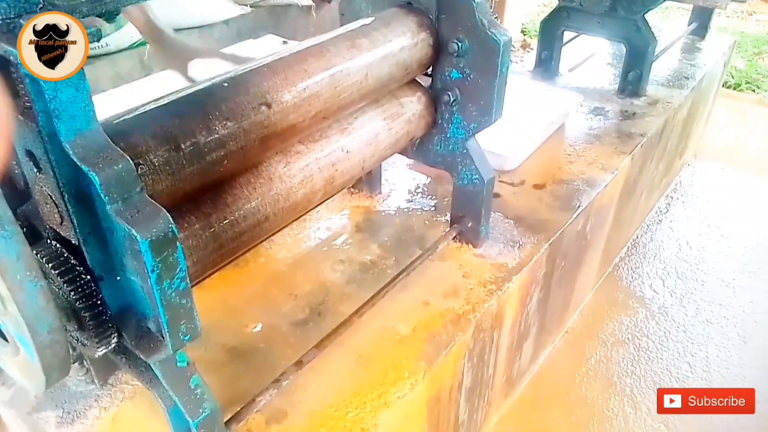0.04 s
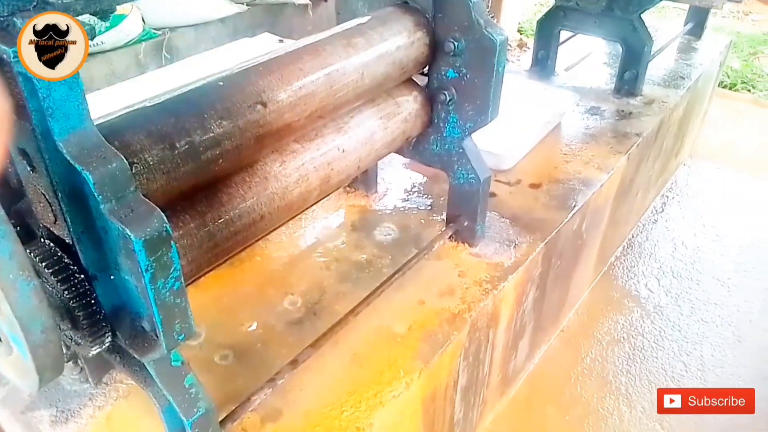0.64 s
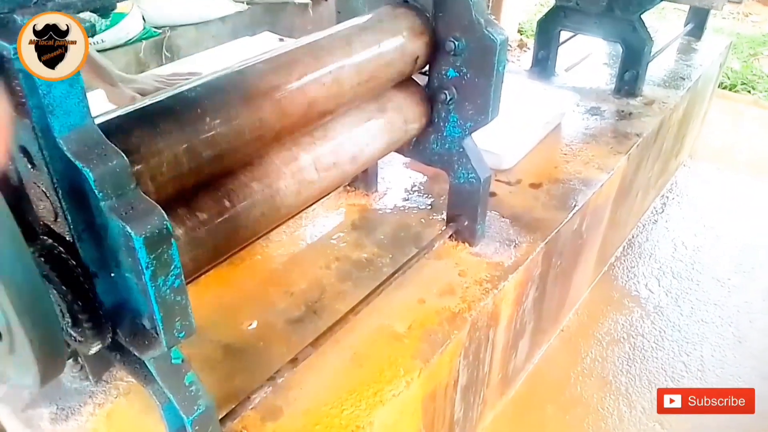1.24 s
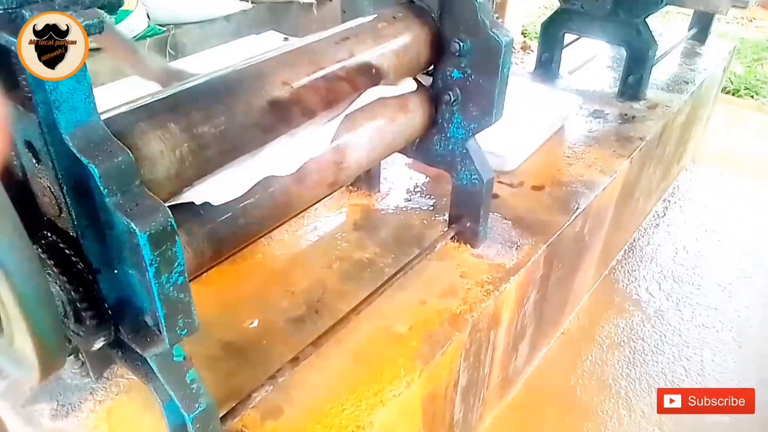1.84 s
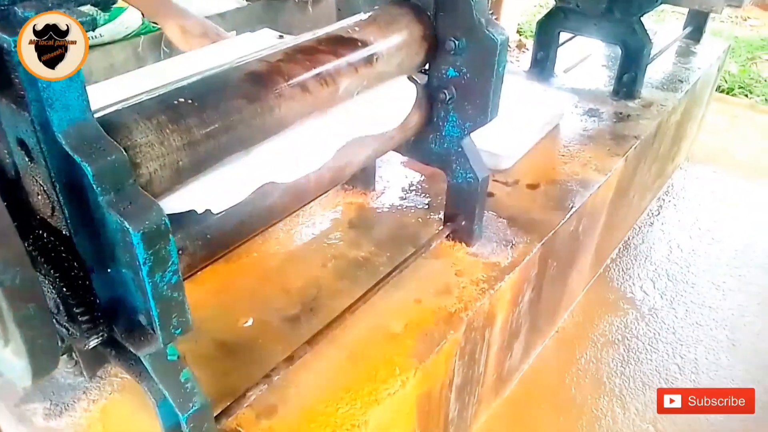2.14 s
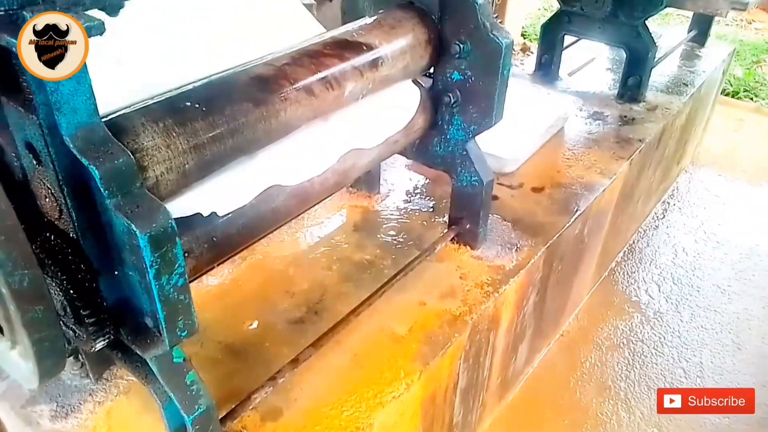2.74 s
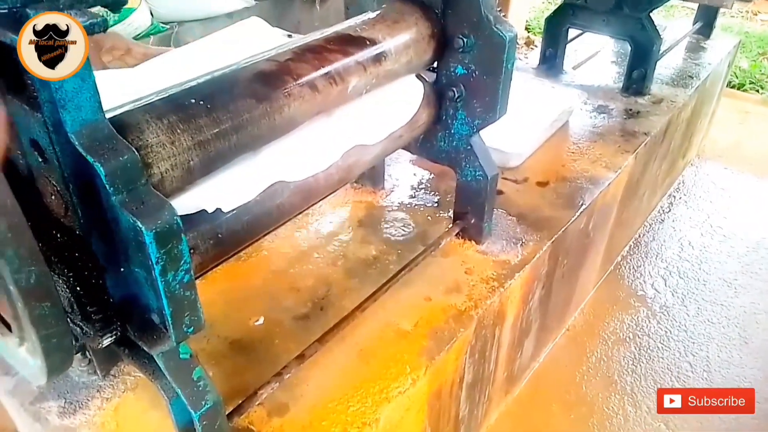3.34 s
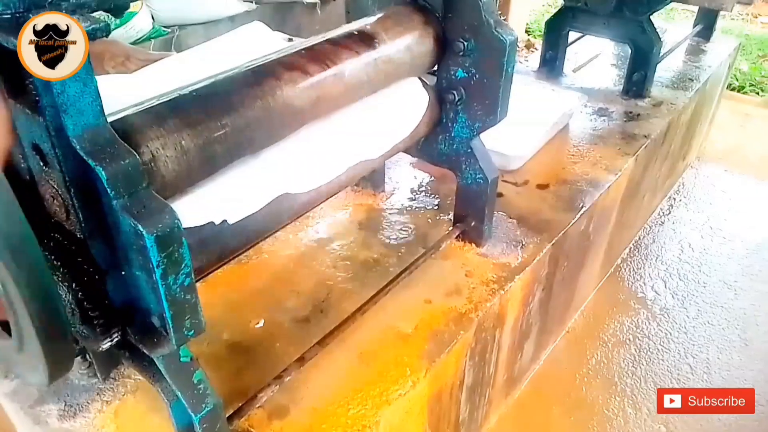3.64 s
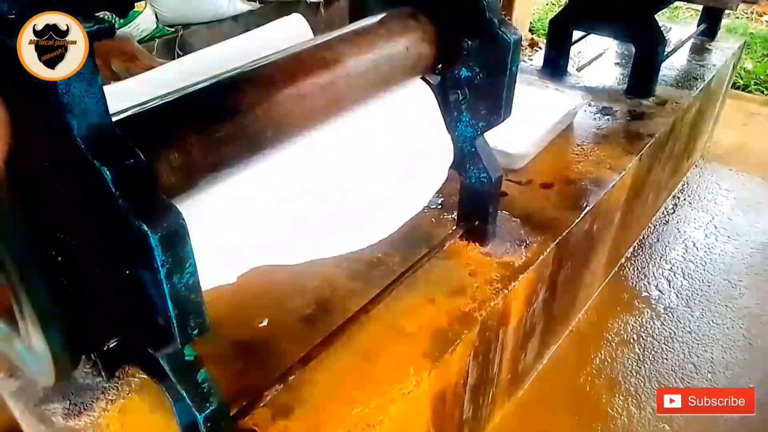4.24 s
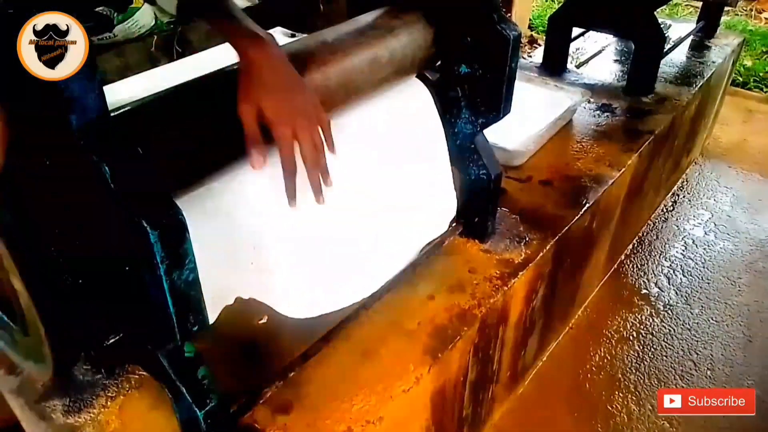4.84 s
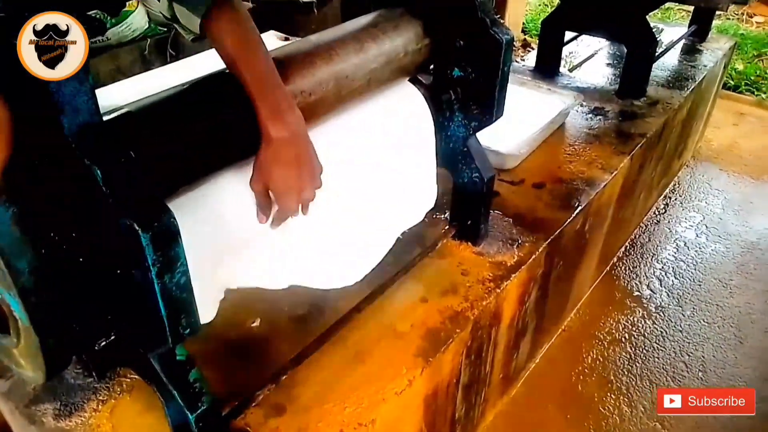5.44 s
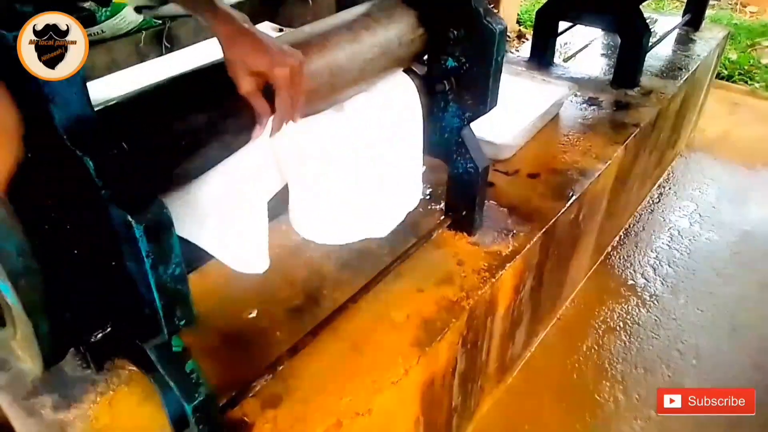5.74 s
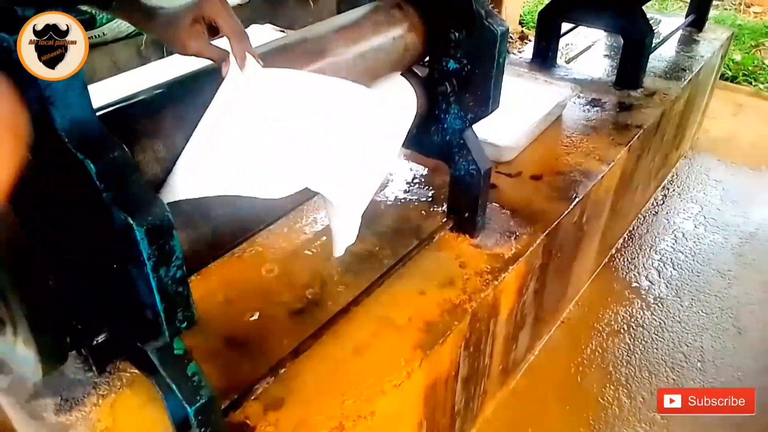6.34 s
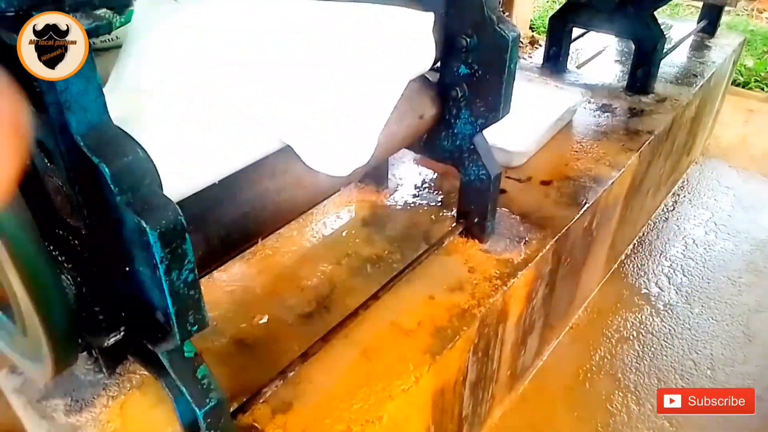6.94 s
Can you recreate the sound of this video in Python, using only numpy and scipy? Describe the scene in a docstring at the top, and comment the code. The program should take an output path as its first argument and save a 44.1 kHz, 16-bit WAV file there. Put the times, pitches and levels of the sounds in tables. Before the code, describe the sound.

Loose metal gear teeth clatter and ring in stop-start turns while wet rubber rustles and squeaks through a hand roller press.

```python
"""Out of doors, a wet rubber sheet is cranked through a hand mangle with cast-iron gears.
Impact excites resonance: loose teeth clash on the frame in short rattling bursts, and the hardest
clashes set the steel ringing. Between them sliding friction makes the gears grind with the crank,
while the sheet rustles, squelches and groans in the rollers and shakes the hollow stand.
Light ticks, dull bearing knocks and a faint rumble and hiss sound over the still air."""
import sys
import numpy as np
from scipy import signal
from scipy.fft import rfft, irfft, next_fast_len
from scipy.io import wavfile

SR = 44100
rng = np.random.default_rng(int(sys.argv[2]) if len(sys.argv) > 2 else 0)


def unload_audio(sound):
    """Save the sound as a 16-bit wav file, at the path given as the first command line argument."""
    columns = np.transpose(np.atleast_2d(sound))
    # keep every value between -1 and 1, then stretch to whole-number steps
    steps = np.round(np.clip(columns, -1, 1) * 32767)
    wavfile.write(sys.argv[1], SR, steps.astype(np.int16))


N = 316197
TIME = np.arange(N) / SR


def from_db(db):
    """Amplitude ratio of a level in decibels."""
    return 10 ** (np.asarray(db) / 20)


def rms(x):
    """Root-mean-square amplitude."""
    return np.sqrt(np.mean(x ** 2) + 1e-24)


def at_level(x, db):
    """Normalisation of an impact by the rms level of its first 25 ms."""
    return from_db(db) * x / rms(x[:SR // 40])


def add(out, start_s, sound):
    """Superposition of a sound on the track."""
    at = max(int(start_s * SR), 0)
    out[at:at + len(sound)] += sound[:len(out) - at]


def arch(start_s, length_s):
    """Half-sine envelope: one swell and decay."""
    return np.sin(np.pi * np.clip((TIME - start_s) / length_s, 0, 1))


def held_db(start, stop, rise_db_s, fall_db_s):
    """Exponential growth, hold and decay, in dB relative to the held level."""
    return -rise_db_s * np.maximum(start - TIME, 0) - fall_db_s * np.maximum(TIME - stop, 0)


def flutter(rate_hz, spread_db=1.8):
    """Random amplitude modulation: a gain that wanders about 1."""
    knots = rng.standard_normal(4000)
    wander = np.interp(TIME * rate_hz, np.arange(len(knots)), knots) * np.sqrt(3 / 2)
    return from_db(spread_db * wander)


def band(x, edges_hz, kind, order=4):
    """Butterworth filtering, maximally flat in the passband."""
    return signal.sosfilt(signal.butter(order, edges_hz, kind, fs=SR, output="sos"), x)


def coloured(spectrum, source):
    """Spectral shaping to rms 1, with a roll-off of 36 dB per octave beyond the given curve."""
    hz, db = np.transpose(spectrum)
    grid_hz = np.maximum(np.arange(N + 1) * SR / (2 * N), 1)
    octaves_outside = np.abs(np.log2(grid_hz / np.clip(grid_hz, hz[0], hz[-1])))
    curve_db = np.interp(np.log(grid_hz), np.log(hz), db) - 36 * octaves_outside
    size = next_fast_len(N)
    gain = np.interp(np.linspace(0, SR / 2, size // 2 + 1), grid_hz, from_db(curve_db))
    out = irfft(rfft(source, size) * gain, size)[:N]
    return out / rms(out)


def resonance(x, hz, width_hz):
    """Forced response of a damped oscillator, with gain 1 at its peak."""
    radius = np.exp(-np.pi * width_hz / SR)
    feedforward = np.array([1, 0, -1]) * (1 - radius ** 2) / 2
    feedback = [1, -2 * radius * np.cos(2 * np.pi * hz / SR), radius ** 2]
    return signal.lfilter(feedforward, feedback, x + 1e-18)


def moving_band(hz, width_hz):
    """Narrow-band noise of rms 1: slow noise modulates a carrier that may glide."""
    noise = rng.standard_normal(len(hz)) + 1j * rng.standard_normal(len(hz))
    envelope = band(noise, width_hz / 2, "low", order=2)
    out = np.real(envelope * np.exp(2j * np.pi * np.cumsum(hz) / SR))
    return out / rms(out)


def contacts(size, per_s, spread_db):
    """A Poisson process of tiny impacts of uneven strength."""
    impulses = (rng.random(size) < per_s / SR) * rng.choice([-1, 1], size)
    return impulses * from_db(spread_db * rng.standard_normal(size).clip(-2, 2))


# spectrum of still outdoor air: (frequency [Hz], relative density [dB])
AIR_SPECTRUM = [(15, -24), (25, -2.5), (154, -22), (344, -4), (1030, -11.5), (2130, -17), (3350, -15.5),
                (7480, -27), (15000, -19.5)]

def outdoor_air(level_db=-79):
    """Ambient noise: a stationary background, strongest at low frequencies."""
    return from_db(level_db) * coloured(AIR_SPECTRUM, rng.standard_normal(N))


# wet squeaks: (time [s], duration [s], start pitch [Hz], end pitch [Hz], bandwidth [Hz], level [dB])
WET_SQUEAKS = [(0.209, 0.21, 806, 970, 22, -74), (0.367, .19, 980, 1110, 30, -82),
               (1.589, .12, 1614, 1370, 130, -47.5), (1.59, .08, 6500, 5900, 280, -67),
               (1.787, .08, 6560, 6070, 280, -52.5), (1.973, .12, 1573, 1374, 140, -47),
               (1.994, 0.058, 6450, 5950, 280, -60), (2.068, .1, 1550, 1360, 150, -58),
               (2.093, .14, 3410, 4020, 350, -53), (2.21, 0.085, 6280, 6050, 250, -64.5),
               (2.998, 0.22, 1500, 1480, 139, -75), (3.505, .11, 1474, 1330, 155, -57),
               (5.07, 0.11, 1570, 1390, 220, -62), (5.622, .15, 1556, 1417, 199.5, -58.5),
               (5.97, 0.096, 1645, 1340, 140, -50.5), (6.133, 0.22, 2030, 2135, 150, -53.5)]

def squelches():
    """Squeeze flow: water pressed out of the sheet squeaks in short glides of narrow-band noise."""
    out = np.zeros(N)
    for start, length, start_hz, end_hz, width_hz, db in WET_SQUEAKS:
        size = int(length * SR)
        glide = moving_band(np.linspace(start_hz, end_hz, size), width_hz)
        add(out, start, from_db(db) * glide * np.sin(np.linspace(0, np.pi, size)))
    return out


def rattle(t, length_s, tail_db=-19, fall_db_s=760, tail_fall_db_s=170, rise_s=0.00026):
    """Contact chatter: two parts collide repeatedly, then their echoes decay exponentially."""
    after = np.maximum(t - length_s, 0)
    attack = 1 - np.exp(-t / rise_s)
    decay = np.hypot(from_db(-fall_db_s * after), from_db(tail_db - tail_fall_db_s * after))
    chatter = contacts(len(t), per_s=2300, spread_db=3) + 0.18 * rng.standard_normal(len(t))
    return attack * decay * chatter


# damped modes of gears and frame: (frequency [Hz], bandwidth [Hz], gain [dB])
FRAME_MODES = [(480, 200, -25), (830, 150, -23), (1025, 70, -20), (1300, 150, -24), (1547, 110, -15),
               (1700, 100, -21), (1892, 80, -13), (2270, 60, -10), (2387, 35, -6), (2530, 90, -12),
               (2748, 70, -5), (2900, 90, -7), (2965, 50, -3), (3033, 50, -3), (3267, 70, -4),
               (3526, 60, -3), (3674, 60, -6), (3827, 70, -3), (3950, 90, -15), (4155, 60, -8),
               (4300, 80, -15), (4478, 70, -20), (4643, 60, -17), (4830, 90, -26), (5130, 110, -23),
               (6040, 200, -34), (6930, 180, -30), (7140, 110, -25), (7700, 280, -36), (10900, 700, -40)]

def frame(blows, favoured_hz, favour_db=10, direct=0.17, reach_hz=160, scatter_db=4):
    """Modal superposition: each point of impact favours different resonances of the frame."""
    body = direct * band(blows, [2200, 4200], "band", order=2) + from_db(-65) * blows
    for k, (hz, width_hz, db) in enumerate(FRAME_MODES):
        emphasis_db = favour_db * np.exp(-((hz - favoured_hz) / reach_hz) ** 2)
        gain = from_db(db + emphasis_db + scatter_db * rng.standard_normal())
        body = body + (-1) ** k * gain * resonance(blows, hz, width_hz)
    return body


# light ticks and wet smacks: (time [s], duration [s], level [dB], relative treble [dB])
LIGHT_CONTACTS = [(0.413, 0.013, -62.5, -10), (0.439, 0.0026, -60.5, -15), (0.508, 0.0031, -72, -22),
                  (0.662, .003, -76, -22), (0.697, 0.0042, -65, -33), (0.761, .014, -64, -25),
                  (1.128, 0.0036, -61, -12), (1.295, 0.0033, -53.5, -25), (1.349, .03, -44, -18),
                  (1.661, 0.0082, -38.5, -21), (2.04, 0.024, -40, -18), (2.454, 0.033, -49, -13),
                  (2.501, .009, -52.5, -16), (2.553, 0.0075, -57, -27), (2.711, .004, -65, -10.5),
                  (2.833, .005, -70.5, -16), (2.969, .005, -60, -23), (3.104, .008, -67, 3),
                  (3.321, .002, -55, -10.5), (3.329, 0.015, -53.5, -16), (3.391, .004, -67, -8),
                  (3.525, 0.0078, -53.5, -24), (3.553, 0.0052, -50, -22), (3.664, 0.047, -46.5, -17),
                  (3.711, 0.0027, -39.5, -32), (5.942, 0.023, -49.5, -21)]

def ticks():
    """Impulse excitation: light contacts only brush the frame and sound its upper modes."""
    out, t = np.zeros(N), np.arange(SR // 4) / SR
    for start, length, db, bright_db in LIGHT_CONTACTS:
        blows = rattle(t, length, tail_db=-26.5)
        body = frame(blows, favoured_hz=4800, favour_db=6.5, direct=.3)
        body = band(body, [2300, 5200], "band", order=3)
        edge = band(blows, [4400, 7600], "band", order=2) * np.exp(-t / .04)
        add(out, start, at_level(body, db) + at_level(edge, db + bright_db))
    return out


# dull knocks in the bearings: (time [s], duration [s], pitch [Hz], level [dB])
BEARING_KNOCKS = [(0.698, .02, 393, -71), (0.761, 0.011, 1280, -67.5), (1.317, 0.03, 780, -50),
                  (1.348, 0.024, 740, -38.5), (1.351, 0.087, 320, -53.5), (1.745, 0.011, 815, -35),
                  (1.778, 0.1, 335, -54.5), (2.649, .004, 930, -67.5), (2.718, .008, 404, -59.5),
                  (2.836, 0.0061, 1070, -59), (2.97, 0.0065, 900, -63), (2.976, .029, 320, -61),
                  (3.034, 0.026, 366, -60.5), (5.498, 0.016, 793, -63), (5.87, 0.034, 863, -45)]

def knocks(relative_width=0.36):
    """Heavy damping: a soft contact in a bearing excites one broad resonance."""
    out, t = np.zeros(N), np.arange(SR // 4) / SR
    for start, length, hz, db in BEARING_KNOCKS:
        body = resonance(rattle(t, length), hz, relative_width * hz)
        add(out, start, at_level(band(body, [230, 2200], "band", order=3), db))
    return out


# spectra of the machine's rumble and fine hiss: (frequency [Hz], relative density [dB])
RUMBLE_SPECTRUM = [(13, -46), (22, -16.5), (30, -9), (96, 5), (127, 1.5), (161, -23.5), (185, -1),
                   (230, -32), (400, -120)]
HISS_SPECTRUM = [(3530, -24), (6000, -12), (6510, -15.5), (7400, -16), (13900, -11), (16000, -1.5)]
# the machine is leant on: (start [s], stop [s], rumble level [dB], hiss level [dB])
LEANS = [(0.82, 0.89, -69.5, -68), (1.223, 1.8, -67.5, -65), (3.67, 4.08, -60, -65.5),
         (4.39, 4.9, -74.5, -76), (5.703, 6.2, -78, -72.5), (6.554, 7.17, -80, -71)]

def shaking(rise_db_s=243, hiss_rest_db=-7.5):
    """Vibration under load: each strain brings a faint rumble and a fine hiss that lingers."""
    rumble = hiss = 0
    for start, stop, rumble_db, hiss_db in LEANS:
        swell_db = held_db(start, stop, rise_db_s, fall_db_s=79)
        rumble = np.maximum(rumble, from_db(rumble_db + swell_db))
        fading_db = held_db(start, stop, rise_db_s, fall_db_s=15.5)
        lingering_db = hiss_rest_db + held_db(start, stop, rise_db_s, fall_db_s=0)
        hiss = np.maximum(hiss, from_db(hiss_db + np.maximum(fading_db, lingering_db)))
    return (rumble * coloured(RUMBLE_SPECTRUM, rng.standard_normal(N))
            + hiss * coloured(HISS_SPECTRUM, rng.standard_normal(N)))


def clash(t, rattle_s, favoured_hz, middle_db, thud_db, edge_db, crack_s=0.0056, top_fade_s=0.027):
    """Impact transient: teeth rattle on the frame, the first contacts hardest and brightest."""
    body = frame(rattle(t, rattle_s), favoured_hz)
    thud = band(body, [220, 2000], "band", order=8)
    middle = band(band(body, [1800, 5600], "band"), 5600, "low")
    edge = band(body, 5800, "high", order=6) * (1 + 1.5 * np.exp(-t / crack_s))
    # the highest treble dies first
    top = .6 * np.exp(-t / top_fade_s) * band(edge, 8200, "high", order=6)
    edge = band(edge, 8200, "low", order=6) + top
    return at_level(middle, middle_db) + at_level(thud, thud_db) + at_level(edge, edge_db)


def ringing(t, modes, rattle_s, db, offset_hz=13):
    """Free vibration: close mode pairs build up and beat as they decay; db is the level near 50 ms."""
    hz, mode_db, t60 = np.transpose(np.repeat(modes, 2, axis=0))[:, :, None]
    # the load on the teeth detunes the modes a little from clash to clash
    hz = hz * (1 + .002 * rng.standard_normal(hz.shape)) + offset_hz * np.resize([-1, 1], hz.shape)
    mode_db = mode_db + np.resize([0, -5], hz.shape) + 2.2 * rng.standard_normal(hz.shape)
    envelopes = from_db(mode_db - 60 * t / t60) / np.sqrt(t60)
    cycles = hz * t + rng.random(hz.shape)
    # the turning gears keep jostling the modes, which blurs their pitch
    jostle = np.cumsum(.006 * rng.standard_normal((len(hz), len(t))), axis=1)
    out = np.sum(envelopes * np.sin(2 * np.pi * (cycles + jostle)), axis=0)
    out *= 1 - np.exp(-t / (0.49 * rattle_s))
    return from_db(db) * out / rms(out[(t > .03) & (t < .07)])


# free modes of the steel and of the gear wheel: (frequency [Hz], relative level [dB], 60 dB decay [s])
STEEL_MODES = [(1030, -10, .2), (1645, -9, .2), (2295, -2, .14), (2955, 3, .16), (3284, -3, .16),
               (3526, 0, .14), (3690, 4, .13), (4020, 0, .2), (4274, -4, .12), (4715, -2, .14),
               (4863, -7, .14), (5073, 0, .17), (5280, -6, .12), (5415, -5, .13), (5620, -14, .14),
               (5980, -9, .16), (6276, -10, .18), (6355, -14, .15), (6597, -17, .13), (6960, -18, .16)]
WHEEL_MODES = [(2385, 0, .17)]
# clashes of the teeth: (time [s], rattle duration [s], favoured resonance [Hz], level [dB],
# relative treble [dB], ring bias toward the steel and away from the wheel [dB])
TOOTH_CLASHES = [(0.928, 0.038, 3120, -34, -13.5, 19), (1, 0.025, 3950, -38, -12.5, 12),
                 (1.059, 0.0058, 3100, -52.5, -9, 17), (1.366, .013, 2810, -24.5, -24, -9),
                 (1.53, 0.015, 3664, -33.5, -18.5, -17), (1.718, .012, 3680, -15, -15, 11.5),
                 (1.927, 0.004, 3440, -23.5, -18, -23), (3.945, 0.0097, 3450, -15.5, -15, 0),
                 (4.133, 0.0029, 3830, -19, -16.5, 9), (4.269, .007, 3980, -18, -32, -6),
                 (4.436, 0.019, 3670, -17, -13.5, 19), (4.546, .007, 3407, -16.5, -24, -2),
                 (4.758, 0.013, 3700, -21, -24, 14), (4.961, 0.021, 2440, -41, -27, -30.5),
                 (5.022, 0.012, 3890, -30, -28, -6), (5.869, 0.031, 4100, -45, -25, -31),
                 (6.103, 0.0084, 2730, -37.5, -40, -7), (6.318, 0.0064, 3155, -18, -29, -12),
                 (6.532, 0.019, 3080, -22, -24, -21.5), (6.658, 0.0046, 3860, -16.5, -27, -9),
                 (6.886, 0.013, 3706, -14.5, -15.5, 11.5), (7.051, 0.014, 2920, -22.5, -33, 1),
                 (7.094, 0.015, 2400, -19.5, -16.5, -16)]

def gear_clashes(rustle_gain, full_load_db=-53.5, firm_clash_db=-17):
    """Backlash: loose teeth collide, and the point of impact decides whether steel or wheel rings."""
    out, t = np.zeros(N), np.arange(SR // 3) / SR
    for start, rattle_s, favoured_hz, db, bright_db, bias_db in TOOTH_CLASHES:
        # the rollers' rustle stands for the load; loaded gears pass more thud into the frame
        load_db = 20 * np.log10(rustle_gain[int(start * SR)]) - full_load_db
        thud_db = -38 + 0.51 * (db - firm_clash_db) + load_db
        impact = clash(t, rattle_s, favoured_hz, db, thud_db, db + bright_db)
        steel = ringing(t, STEEL_MODES, rattle_s, db - 28.5 + bias_db)
        wheel = ringing(t, WHEEL_MODES, rattle_s, db - 37.5 - bias_db)
        add(out, start, impact + steel + wheel)
    return out


# turns and nudges of the crank: (start [s], stop [s], run-up [s], time to pull the sheet taut [s],
# gear level [dB], roller level [dB], stand level [dB])
CRANK_TURNS = [(0.94, 1.024, 0.077, 0.012, -50.5, -61.5, -81), (1.36, 2.053, 0.087, .01, -48.5, -50, -62.5),
               (2.46, 2.48, 0.1, .01, -56.5, -68.5, -85), (3.69, 4.979, 0.17, 0.5, -49, -49.5, -46),
               (5.89, 7.17, 0.016, 0.79, -49.5, -51.5, -61.5)]

def cranking(run_up_db=16, slack_db=-17.5, yield_db_s=8.5, gear_creep_db=-30.5, roller_creep_db=-21.5):
    """Friction noise follows motion and load: the gains of gears, rollers and stand over each turn."""
    gears = rollers = stand = 0
    for start, stop, run_up_s, taut_s, grind_db, rustle_db, stand_db in CRANK_TURNS:
        rise_db_s = run_up_db / run_up_s
        running = from_db(held_db(start, stop, rise_db_s, fall_db_s=137))
        creeping = from_db(held_db(start, stop, rise_db_s, fall_db_s=1))
        meshing = np.maximum(running, from_db(gear_creep_db) * creeping)
        rolling = np.maximum(running, from_db(roller_creep_db) * creeping)
        # the load rises as the sheet pulls taut, then eases as the rubber yields
        slack = np.clip((start + taut_s - TIME) / taut_s, 0, 1)
        yielding_s = np.maximum(np.minimum(TIME, stop) - start - taut_s, 0)
        load_db = slack_db * slack - yield_db_s * yielding_s
        gears = np.hypot(gears, meshing * from_db(grind_db + .25 * load_db))
        rollers = np.hypot(rollers, rolling * from_db(rustle_db + load_db))
        stand = np.hypot(stand, rolling * from_db(stand_db + load_db))
    return gears, rollers, stand


# spectrum of iron sliding on iron: (frequency [Hz], relative density [dB])
GRIND_SPECTRUM = [(1060, -28), (1800, -10.5), (1960, -15.5), (2020, -8), (2200, -10), (2610, -14.5),
                  (3040, -2.5), (3630, -3.5), (4180, -2.5), (4880, -20), (5810, -33), (7550, -37),
                  (9000, -43.5), (11700, -66.5), (19800, -120)]

def gear_grind(gain):
    """Sliding friction: rough iron moves in dense tiny slips that excite the modes of the frame."""
    slips = contacts(N, per_s=2000, spread_db=3)
    ring = sum(resonance(slips, hz, width_hz) for hz, width_hz, _ in FRAME_MODES)
    return gain * flutter(rate_hz=60) * coloured(GRIND_SPECTRUM, slips + 0.36 * ring)


# spectrum of the wet rollers: (frequency [Hz], relative density [dB])
ROLLER_SPECTRUM = [(250, -11.5), (430, -7), (488, -5), (569, -3), (937, -1), (1030, 1.5), (1340, -3),
                   (1680, 0.5), (2010, -32.5), (2300, -12), (2990, -40), (5060, -120)]

def roller_rustle(rolling, rubs):
    """Contact noise: the wet sheet rustles as it is rolled and handled, and the two powers add."""
    gain = np.hypot(rolling, rubs) * flutter(rate_hz=50)
    return gain * coloured(ROLLER_SPECTRUM, contacts(N, per_s=5000, spread_db=7))


# resonances of the stand: (frequency [Hz], bandwidth [Hz], relative level [dB])
STAND_MODES = [(320.4, 55, 1.5), (456, 74, -1.5), (374.5, 81, -4)]

def hollow_stand(rolling, rubs, rub_coupling_db=2.5, groan_coupling_db=-6.5):
    """Forced vibration: rolling, rubs and groans shake the stand at its low resonances."""
    drags = sum(from_db(db) * arch(start, length) for start, length, _, _, db in RUBBER_DRAGS)
    shakes = from_db(rub_coupling_db) * rubs + from_db(groan_coupling_db) * drags
    modes = sum(from_db(db) * moving_band(np.full(N, hz), width_hz) for hz, width_hz, db in STAND_MODES)
    return np.hypot(rolling, shakes) * modes / rms(modes)


# the sheet is handled: (time [s], duration [s], level [dB])
SHEET_RUBS = [(1.218, 0.23, -64), (2.5, 0.54, -76), (5.495, 0.36, -65.5)]

def rubbing():
    """Friction of handling: a gain that swells and fades with each rub of the sheet."""
    return sum(from_db(db) * arch(start, length) for start, length, db in SHEET_RUBS)


# rubber drags through the nip: (time [s], duration [s], start pitch [Hz], end pitch [Hz], level [dB])
RUBBER_DRAGS = [(4.353, 0.26, 220, 278, -39.5), (4.57, 0.24, 250, 226.4, -47),
                (4.714, 0.32, 238, 275.6, -43), (4.971, 0.45, 275, 186.3, -47),
                (6.29, 0.32, 395, 424, -48.5), (6.86, .22, 522, 535, -54.5)]

def groans(skirt_db=-10, octave_db=-13):
    """Friction-induced vibration: dragged rubber groans in hollow, unsteady glides."""
    out = np.zeros(N)
    for start, length, start_hz, end_hz, db in RUBBER_DRAGS:
        hz = np.linspace(start_hz, end_hz, int(length * SR))
        core = moving_band(hz, width_hz=30)
        skirt = from_db(skirt_db) * moving_band(hz, width_hz=110)
        octave = from_db(octave_db) * moving_band(2 * hz, width_hz=70)
        swell = np.sin(np.linspace(0, np.pi, len(hz)))
        add(out, start, from_db(db) * swell * (core + skirt + octave))
    return band(out, 230, "high", order=6)


def scene():
    """Linear superposition of all sources at one close microphone."""
    grind_gain, rustle_gain, stand_gain = cranking()
    rubs = rubbing()
    air = outdoor_air()
    impacts = gear_clashes(rustle_gain) + ticks() + knocks()
    friction = gear_grind(grind_gain) + roller_rustle(rustle_gain, rubs) + hollow_stand(stand_gain, rubs)
    return (air + impacts + friction + groans() + squelches() + shaking())[None]


def record(dry):
    """Band limiting: a steep elliptic low-pass removes the highest treble."""
    cutoff_hz = 15900
    return signal.sosfilt(signal.ellip(10, .2, 80, cutoff_hz, fs=SR, output="sos"), dry)


dry = scene()
out = record(dry)
unload_audio(out)
```